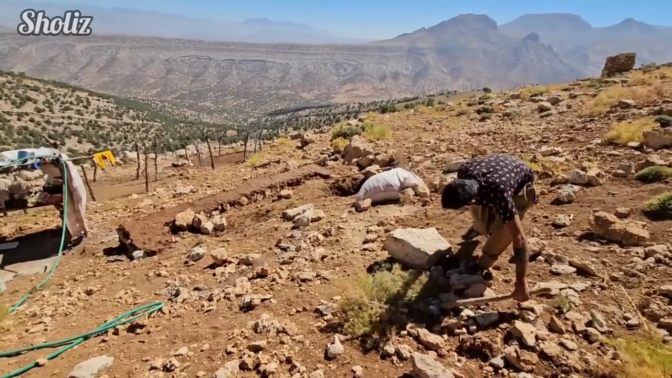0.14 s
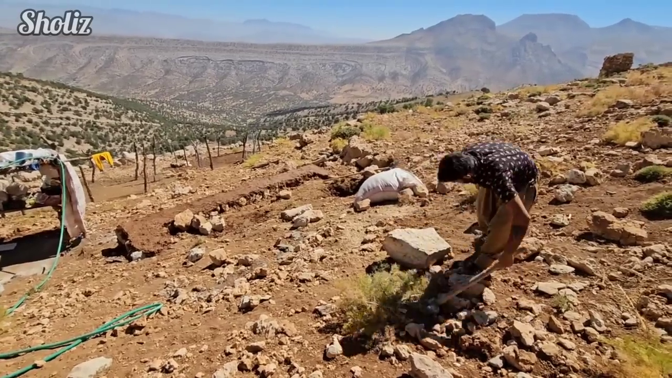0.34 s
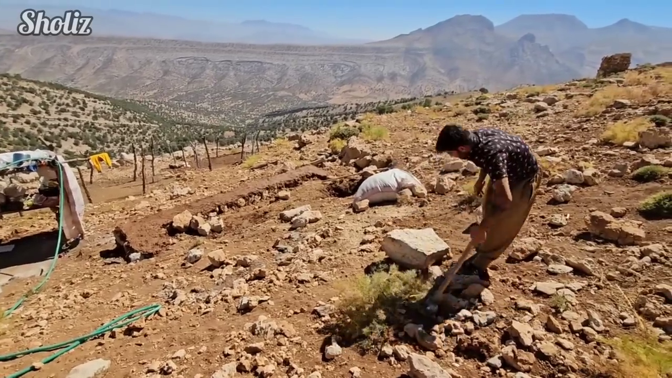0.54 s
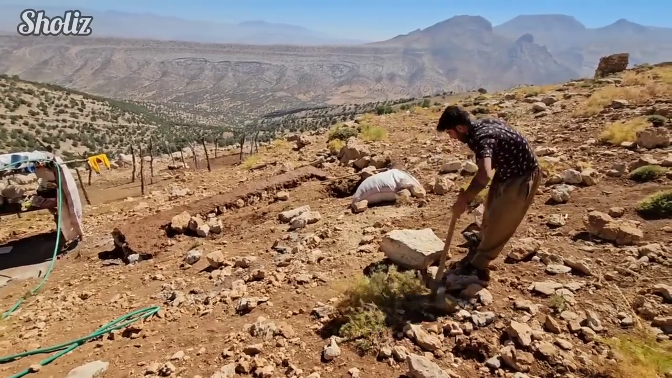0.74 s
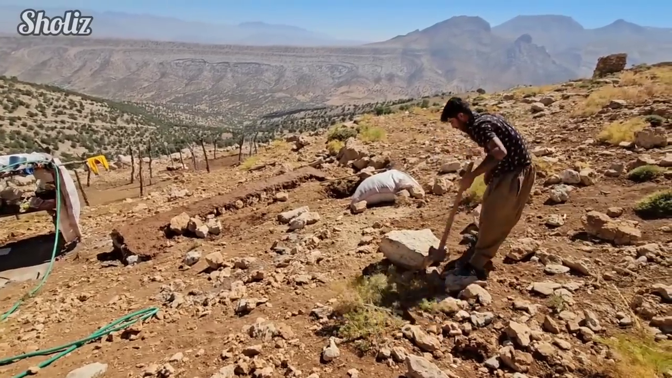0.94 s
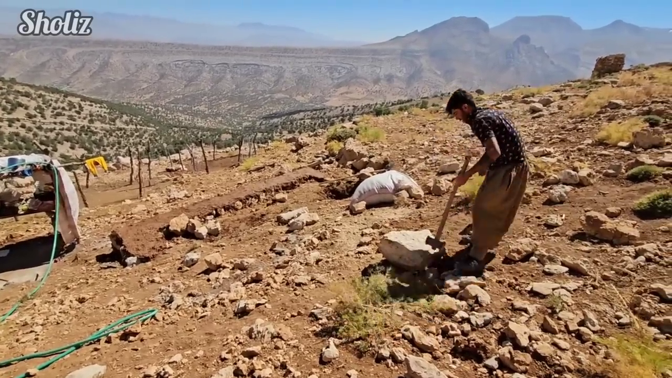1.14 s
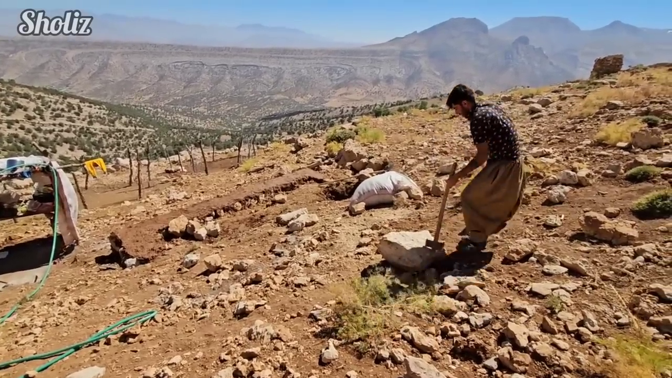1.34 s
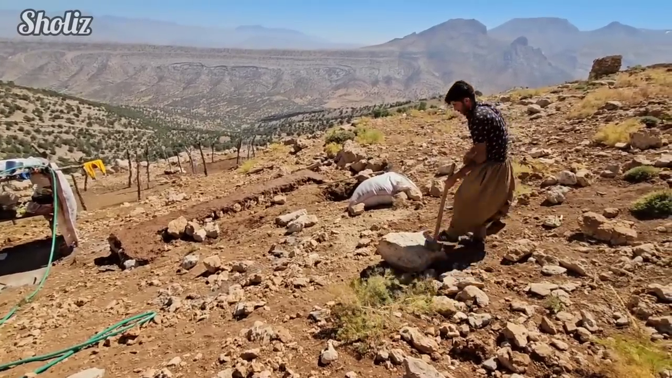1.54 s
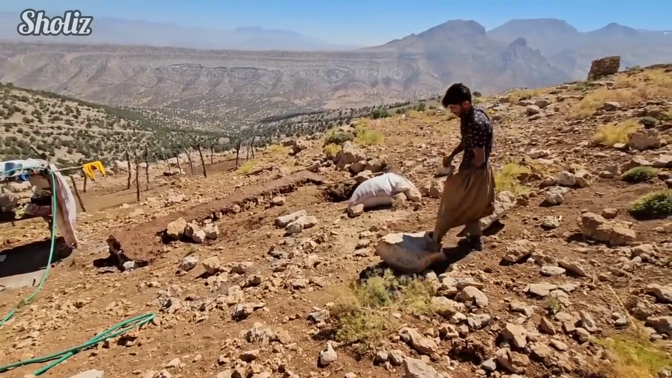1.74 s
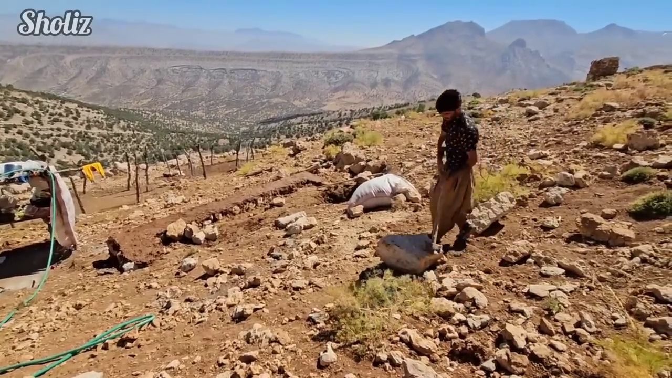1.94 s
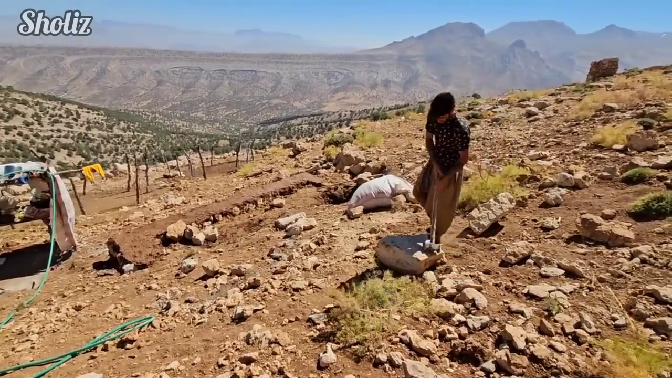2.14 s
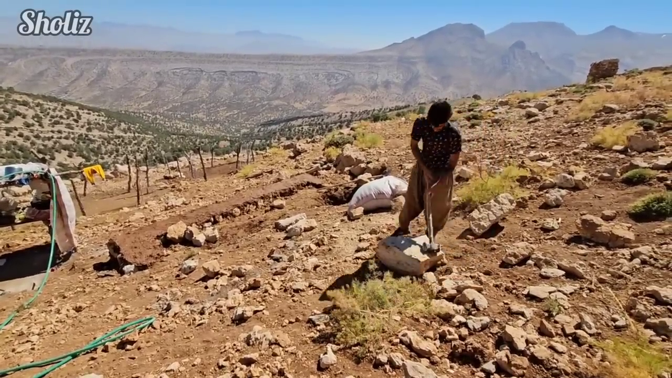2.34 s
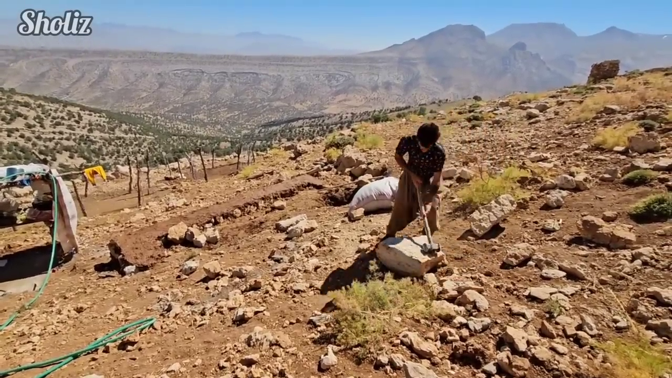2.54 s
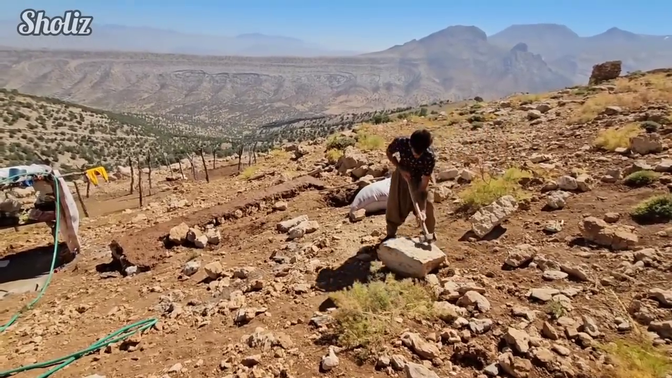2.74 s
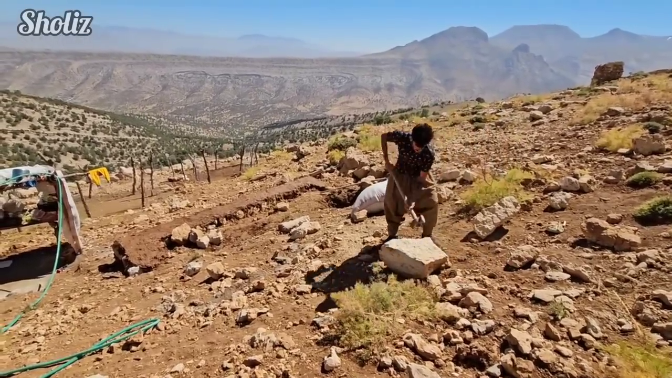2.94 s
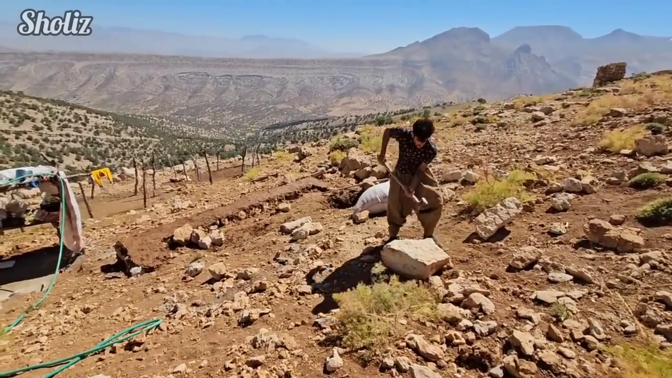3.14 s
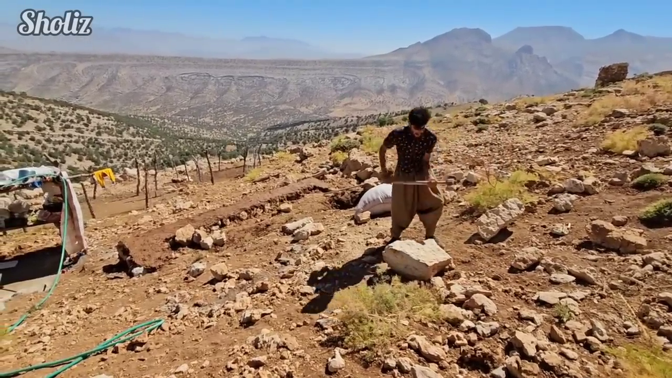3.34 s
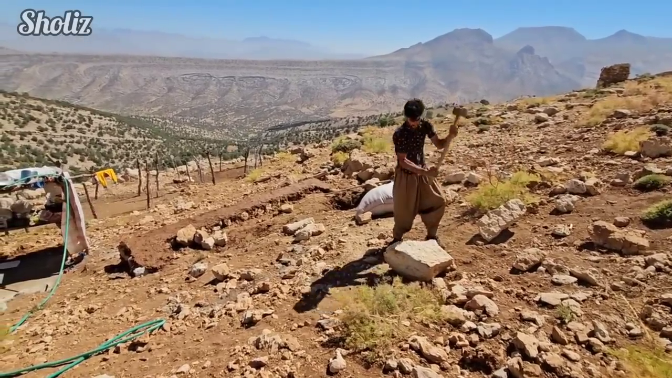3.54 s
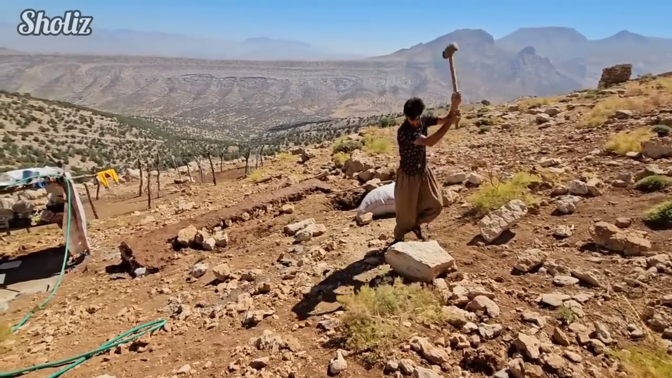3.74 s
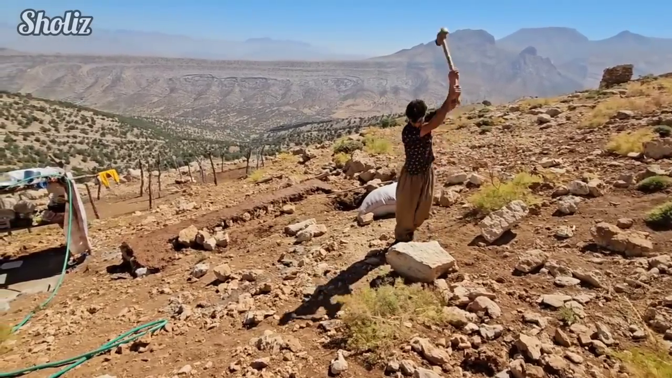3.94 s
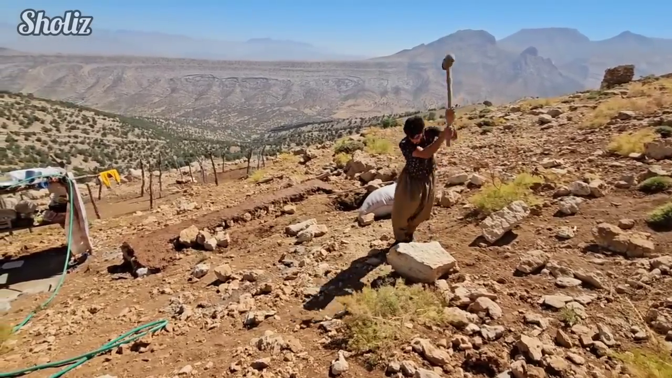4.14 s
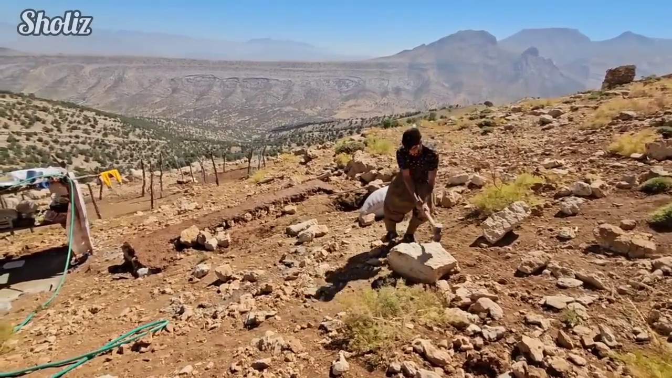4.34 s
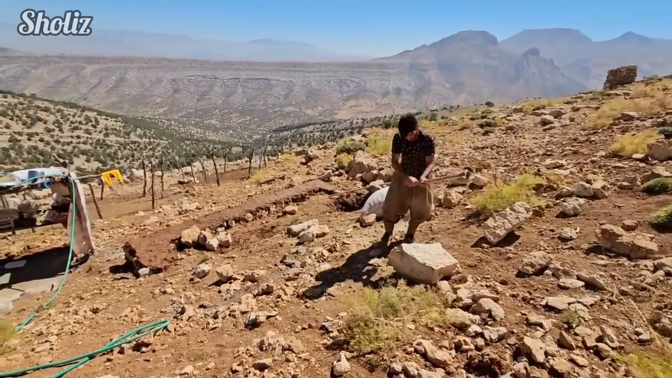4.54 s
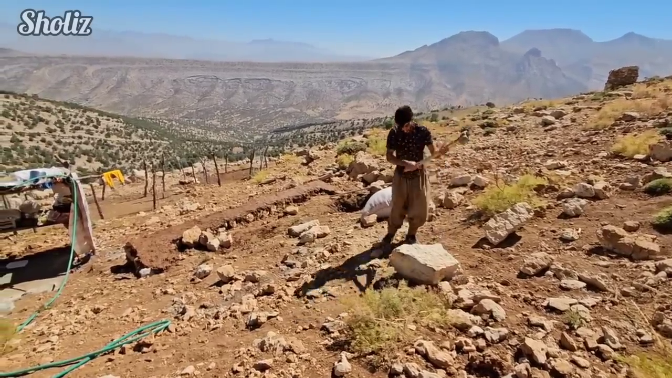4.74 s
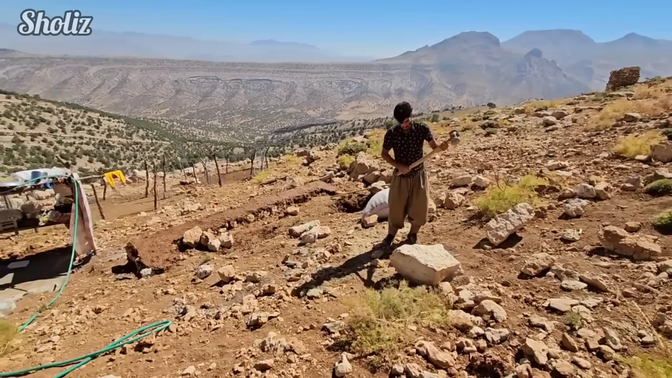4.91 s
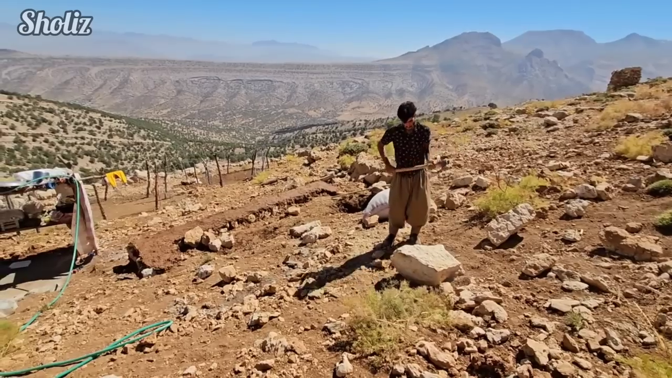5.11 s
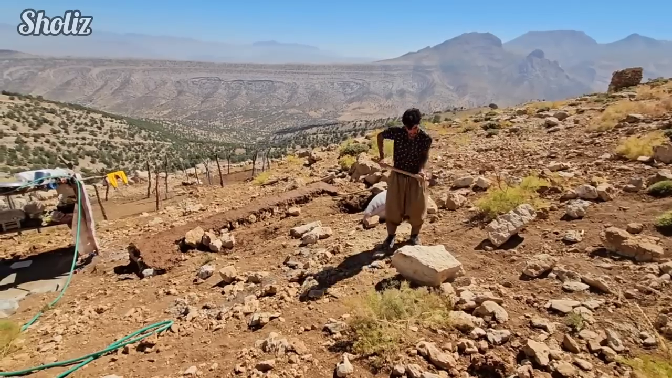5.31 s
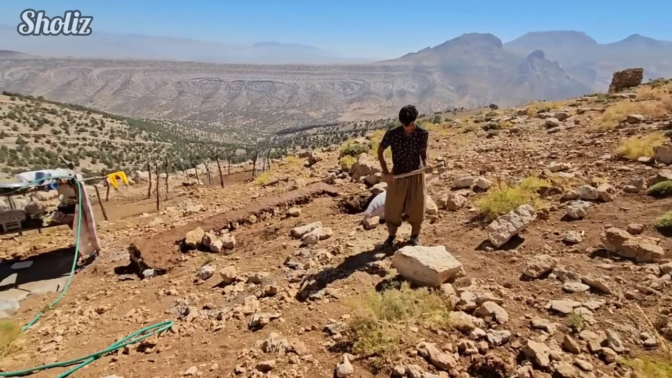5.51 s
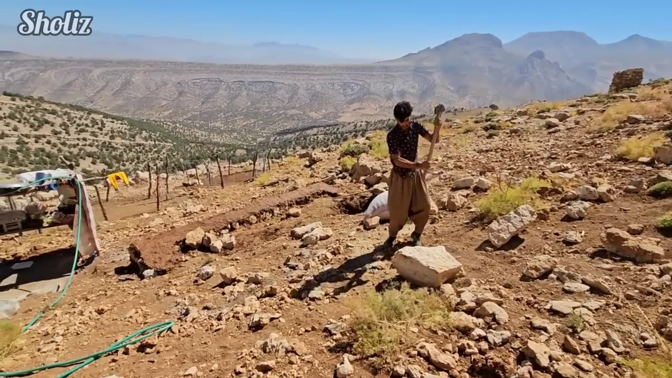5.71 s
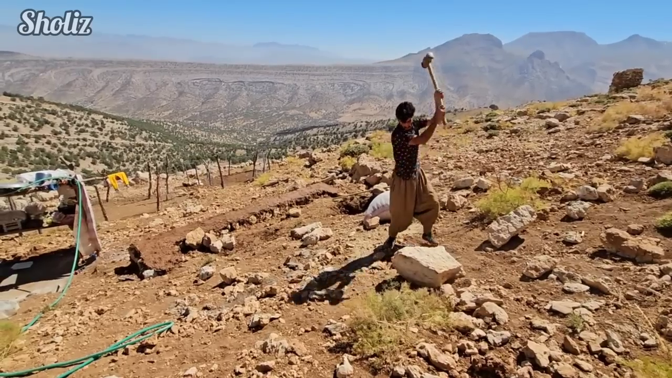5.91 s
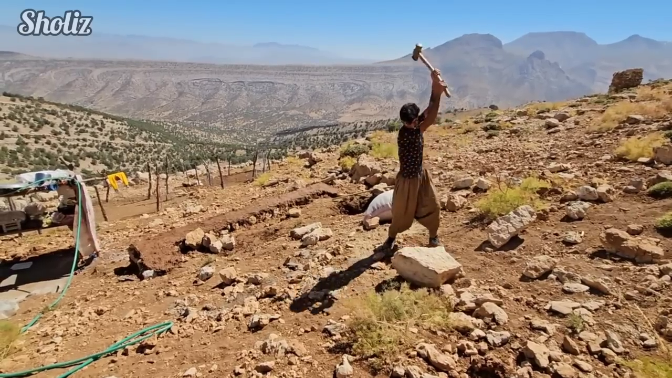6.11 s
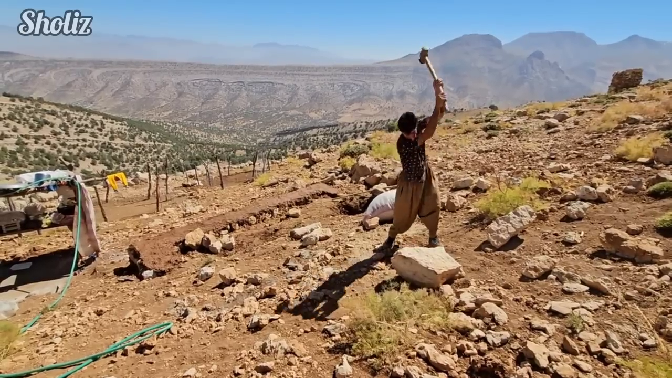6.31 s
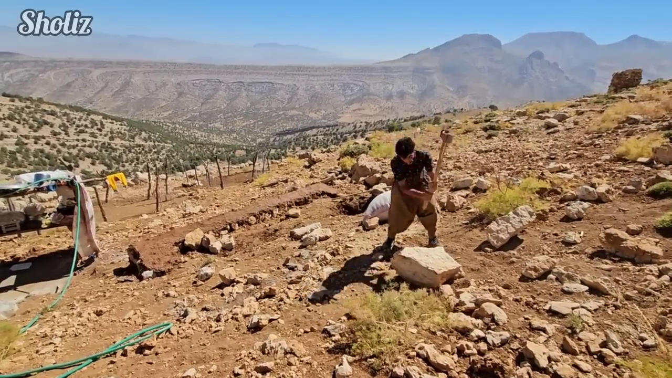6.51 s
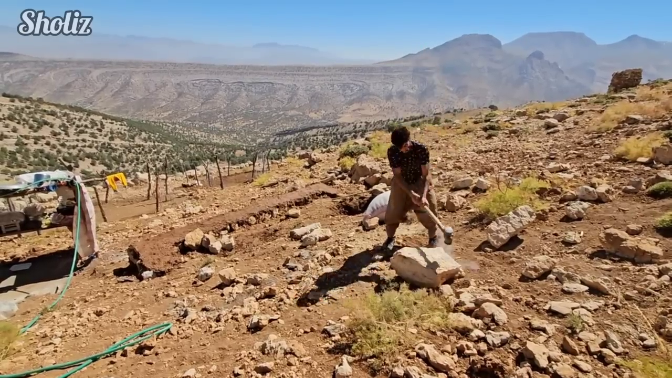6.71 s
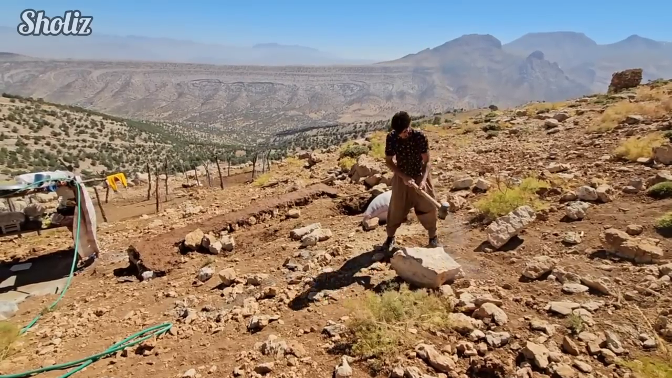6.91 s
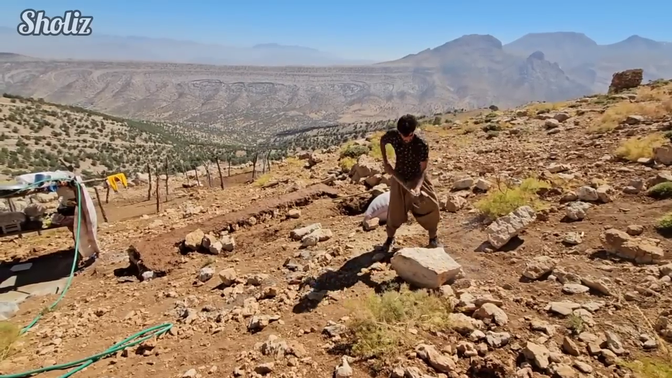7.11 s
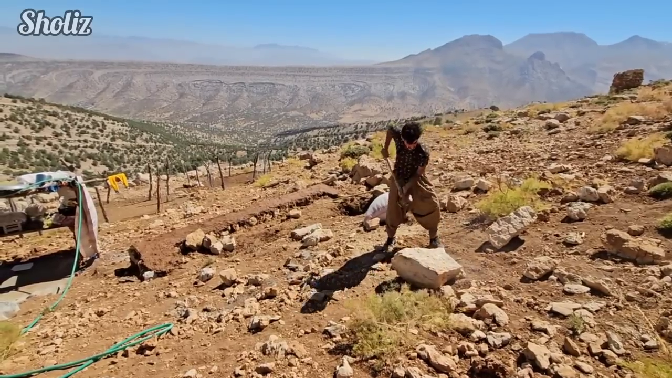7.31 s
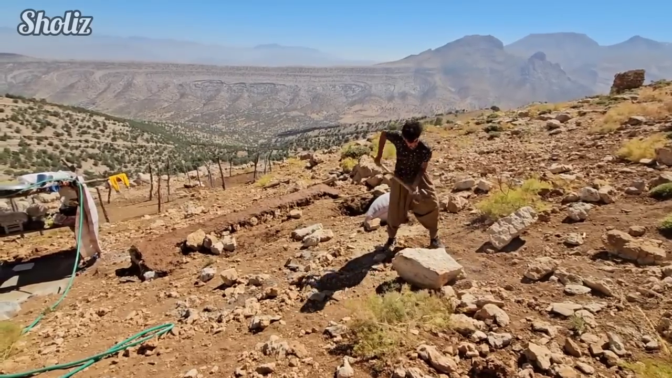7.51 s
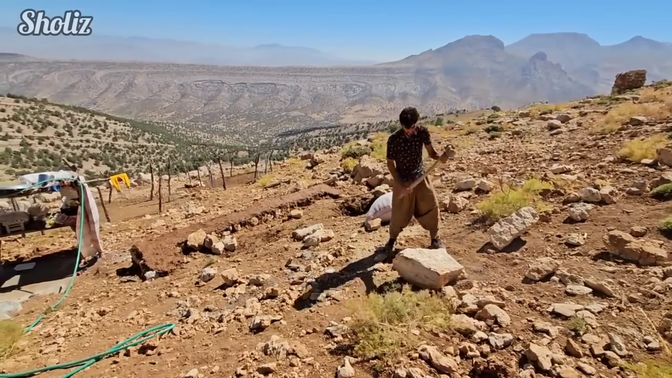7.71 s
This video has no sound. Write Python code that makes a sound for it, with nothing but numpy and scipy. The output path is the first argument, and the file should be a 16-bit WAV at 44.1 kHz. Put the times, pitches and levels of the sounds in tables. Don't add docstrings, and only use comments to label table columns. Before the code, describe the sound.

Low gusts thump on an unshielded handheld stereo microphone. A moderate clack of steel on stone comes first, followed by gritty steps round the rock and pebbles clicking. Then come two very loud, abrupt hammer cracks about two seconds apart, each with a brief high steel ring, ticking splinters and a faint open-air echo. Dry grass rustles lightly and a faint distant engine putters in bursts beneath the hiss of air.

```python
import sys
import numpy as np
from scipy import signal
from scipy.fft import rfft, irfft, next_fast_len
from scipy.io import wavfile

SR = 44100
rng = np.random.default_rng(int(sys.argv[2]) if len(sys.argv) > 2 else 0)


def amplitude_ratio(level_db):
    exponent = np.asarray(level_db, float) / 20
    return 10 ** exponent


def generate_wav(signal):
    frames = np.transpose(np.atleast_2d(signal))
    scaled = np.clip(frames, -1, 1) * 32767
    pcm = np.round(scaled).astype(np.int16)
    wavfile.write(sys.argv[1], SR, pcm)


N = 346626

BLOW_TIMES = [
    1.2012,
    4.3541,
    6.5984,
    6.6262,
]
# peak in dB, crack in dB, crack length in seconds, scatter in dB,
# scatter decay in seconds, crushing time in seconds.
BLOWS = [
    (-17.5, -11.5, 0.0051, -40.5, 0.0085, 0.00042),
    (0.5, -10, 0.0014, -27.5, 0.024, 0.0006),
    (1, -8.5, 0.0011, -23, 0.011, 0.0003),
    (-15.5, -20, 0.00087, -21.5, 0.017, .0004),
]
SLAM_DB = [-4.5, -3, -2.5, 1]
# pitch in Hz, t60 in seconds.
ROCK_MODES = [(300,0.027),(540,0.022),(705,0.018),(1020,0.0069),(1260,0.009),(1420,.013),(1800,0.012),(2050,0.022),(2720,.012),(3300,.01),(4200,0.014),(5200,0.036)]
ROCK_DRIVE_DB = [
    (-6.5, -1.5, -2.5, -4, -3.5, -6.5, 2.5, -2, -9, -3.5, -15, -18),
    (-18, -12.5, -5.5, -7, 0.0, -0.5, -1.5, -12, -15.5, -18.5, -28.5, -15.5),
    (-23.5, -14.5, -6.5, -5.5, -1, -2, -11, -10, -12.5, -22.5, -12.5, -14),
    (-11.5, -5, -0.5, 1.5, -2.5, -6, -6.5, -10, -19, -16, -21, -20.5),
]
HEAD_HZ = [5190, 7141, 7198, 7225, 8317, 8390, 8565, 11300, 11900, 14390]
HEAD_T60_S = [0.12, 0.3, 0.53, 0.2, .2, 0.23, 0.06, 0.35, .07, .2]
HEAD_DRIVE_DB = [
    (-56, -51, -57, -52.5, -49, -67.5, -62, -63, -48, -50),
    (-38, -36.5, -33.5, -24.5, -38.5, -40.5, -38, -61.5, -46, -47),
    (-39, -50.5, -42, -48, -42, -35.5, -34, -67, -46, -60.5),
    (-59, -48.5, -38, -45.5, -54.5, -63.5, -66.5, -66.5, -68, -68),
]
# frequency in Hz, density in dB per Hz.
CRACK_COLOUR = [(2000, -7.5), (3000, -0.5), (4500, 2.5), (6200, 2), (8400, -8), (9600, -14.5),
                (11300, -3.5), (13000, -8.5), (16000, -10), (20000, -40.5)]
# frequency in Hz, density in dB per Hz.
SCATTER_COLOUR = [(150, -39), (250, 0), (348, -22), (528, 0.5), (890, -7.5), (2000, -4), (5160, -12),
                  (6590, -19), (8400, -13.5), (9900, -22.5), (11400, -17.5), (16000, -23.5)]
# frequency in Hz, gain in dB, phase in radians.
SHADOW = [(300, 4, 0.43), (750, 3.5, -1.37), (1100, 2.5, -1.22), (1800, -2, -1.4), (3000, 0.5, -0.7),
          (4200, 2.5, 2.16), (8400, 0.5, 1.41), (10960, 0, 0.5), (13300, -2.5, 3)]
# time in seconds, level in dB.
GRAZES = [
    (2.625, -73),
    (2.694, -67),
]

# time in seconds, peak in dB, pitch in Hz, bright edge in dB.
STONES = [(0.376, -59, 765, -53), (0.958, -53.5, 1590, -22), (1.013, -45, 686, -17), (1.3, -44, 730, -28),
          (1.342, -45.5, 1780, -20), (1.545, -44.5, 1890, -9), (2.74, -53, 4250, -20),
          (1.375, -48, 1500, -20), (1.651, -44.5, 720, -38), (1.667, -43.5, 1710, -24),
          (1.567, -51.5, 2220, -19), (1.895, -55, 2000, -15), (2.168, -55.5, 2300, 9),
          (2.232, -53.5, 1280, 3.5), (2.540, -45.5, 2060, -12), (0.824, -65, 1430, -6),
          (0.876, -60, 1510, -15), (1.011, -47, 1860, -23), (1.455, -71, 1680, -27),
          (2.003, -53, 1490, -26), (2.394, -52, 2050, -15), (2.396, -69, 4050, -22),
          (2.563, -56, 1760, -22), (2.624, -49.5, 2340, -16), (2.687, -47, 1700, -13),
          (2.825, -77, 3100, -30), (2.996, -44.5, 955, -26), (3.006, -61, 2030, -14),
          (2.914, -51, 870, -16), (3.253, -63, 1390, -22), (3.302, -42.5, 846, -14.5),
          (3.42, -58, 794, -37), (3.527, -48, 820, -18), (4.965, -75, 598, 3.5), (5.24, -80.5, 485, 11.5),
          (5.35, -59.5, 730, -29), (5.643, -50, 686, -8.5), (5.858, -53.5, 810, -12.5),
          (5.921, -71, 790, -33), (6.635, -42.5, 810, 8.5), (6.925, -60, 1330, 3), (7.158, -72, 532, 7)]
# time in seconds, peak in dB, pitch in Hz, bright edge in dB.
SLAB = [
    (0.398, -48, 366.6, -63),
    (5.441, -70.5, 341.5, -32),
    (5.857, -56.5, 359, -44.5),
    (5.922, -51, 380, -52),
]
# time in seconds, peak in dB, pitch in Hz, bright edge in dB.
KNOCKS = [
    (2.694, -34, 673, -44),
    (4.508, -44.5, 1290, -63),
    (4.559, -55, 700, -42),
    (6.491, -46, 640, -39),
]
# time in seconds, peak in dB, pitch in Hz, bright edge in dB.
SPLINTERS = [(0.537, -69, 3000, 14.5), (0.771, -74, 3000, 9), (0.803, -66, 3000, 9), (0.868, -80, 3000, 16),
             (4.694, -64, 899, -18), (4.725, -74, 1560, -11), (6.641, -63.5, 3000, 6),
             (6.656, -53, 2000, -4), (6.692, -74.5, 3000, 14), (6.697, -68, 3000, 14),
             (6.742, -73, 3000, 18), (6.802, -68.5, 3000, 15.5), (6.958, -77, 3000, 14),
             (6.756, -79.5, 3000, 15.5), (6.861, -76, 3000, 14), (6.875, -82, 3000, 14),
             (6.911, -84, 3000, 12)]
# time in seconds, peak in dB, pitch in Hz, bright edge in dB.
FLAKES = [(4.53, -64, 2060, -50), (4.585, -84.5, 4250, -50), (4.64, -76, 11400, -50),
          (4.665, -75, 1324, -49.5), (5.31, -86, 1670, -50.5), (5.395, -89, 2700, -45),
          (5.452, -71, 3160, -46.5), (6.93, -68, 1392, -51.5)]

# start in seconds,
# length in seconds, crunch in dB, larger stones in dB above it, grit in dB above it.
SCUFFS = [(0.875, 0.021, -46, -11, -12.5), (0.95, 0.069, -48.5, -2, -11.5), (1.219, 0.15, -54, -0.5, -6),
          (1.331, 0.049, -41, -8.5, -14.5), (1.542, 0.03, -53, -10, -1.5), (1.607, 0.023, -54, -25, -2.5),
          (1.663, 0.071, -44, -10.5, -12.5), (1.75, 0.055, -60.5, 1.5, -13.5), (1.89, 0.0098, -54, -6, -4),
          (1.935, 0.079, -51.5, -5, -10), (1.998, 0.043, -41.5, -13.5, -10.5),
          (2.06, 0.079, -62.5, -21, -1.5), (2.229, 0.042, -56.5, -4.5, 2), (2.282, 0.12, -48, -10.5, -7.5),
          (2.451, 0.11, -61, 5.5, -8), (2.537, 0.016, -49, -7, 1), (2.608, 0.15, -49, -18, -6.5),
          (2.813, 0.031, -59.5, -9, -10), (2.905, 0.071, -52, -4.5, -10), (2.99, 0.068, -43.5, -3.5, -9.5),
          (3.094, 0.097, -52, -1.5, -13.5), (3.252, 0.084, -46.5, -7.5, -15), (3.402, 0.055, -61, 8, -12.5),
          (3.518, 0.0079, -62, 21, 2),
          (0, 0.0047, -52, 8.5, 1.5), (.14, 0.12, -78, -19, -14), (0.376, 0.053, -58, 10, -4),
           (.47, 0.12, -74, -3, -1), (0.594, 0.0043, -62.5, 5.5, 7), (0.811, 0.079, -56, -14, -6.5),
           (3.721, 0.26, -66.5, -1.5, -23), (4.2, 0.19, -75.5, 10.5, -10), (4.45, 0.024, -65, -9, -11),
           (4.69, 0.007, -82, 16.5, -4), (5.342, 0.11, -84.5, 23, -12), (5.638, 0.035, -62, 13.5, -5.5),
           (5.847, 0.064, -62.5, 7, -9), (5.918, 0.046, -52.5, 3.5, -13.5), (6.0, .25, -80.5, -3, 13.5),
           (6.467, 0.089, -69.5, -9, -3.5), (6.7, 0.097, -76.5, 9, 7), (6.919, 0.047, -63, 1, -8),
           (7.0, 0.1, -74, -17, -10), (7.2, 0.31, -76.5, 3.5, -2)]
# frequency in Hz, density in dB per Hz.
GRAVEL_COLOUR = [(240, -44), (400, -20), (814, -6), (1220, -5.5), (1730, -7), (3310, -21), (4050, -17),
                 (5110, -24.5), (7060, -20.5), (7870, -28), (16000, -46)]

# start in seconds, length in seconds, level in dB.
RUSTLES = [(0, 0.023, -65.5), (0.128, 0.61, -73), (2.122, 0.067, -68), (3.374, 0.23, -77),
           (3.643, 0.086, -70.5), (5.875, 0.95, -72.5), (6.698, 0.15, -74.5), (6.864, 0.24, -64.5),
           (7.247, 0.32, -69.5), (7.638, 0.17, -68)]
# frequency in Hz, density in dB per Hz.
GRASS_COLOUR = [(900, -19), (1850, -4.5), (3100, -11), (4600, -8), (5900, -11.5), (7300, -4.5),
                (9700, -13.5), (11200, -7), (16000, -15.5)]

# time in seconds, level in dB, exhaust pitch as a factor.
PUTTER = [(0, -79, 1), (3.7, -84, 1), (4.2, -85.5, .85), (4.26, -71, 1.05), (4.31, -62, 1.1),
          (4.36, -69, 0.86), (4.5, -84, 1), (5.03, -98, .8), (5.1, -74.5, .9), (5.17, -69, 1.1),
          (5.23, -71, 1.02), (5.28, -88, .9), (6.7, -83.5, .9), (6.85, -69, 1), (7.0, -85, .9),
          (7.3, -79, .9), (7.43, -71.5, 1.03), (7.5, -79, .9), (7.54, -94.5, 0.83), (7.72, -100, .85),
          (7.78, -72, 1), (7.86, -73, 1)]
# pitch in Hz, t60 in seconds, level in dB.
EXHAUST_MODES = [(730, .04, 0), (1050, .025, -13), (1250, .035, -7), (1850, .025, -16)]

# start in seconds, length in seconds, rumble in dB, left over right in dB.
GUSTS = [(0, 0.34, -36.5, -6), (0.48, 0.14, -34.5, -7.5), (0.611, 0.2, -31, -2.5),
         (1.045, 0.18, -36.5, -3.5), (1.257, 0.075, -40, -8), (1.418, 0.11, -37, -3.5),
         (1.578, 0.31, -43.5, -8), (1.839, 0.05, -37.5, -10), (2.087, 0.039, -25, -9.5),
         (2.17, 0.4, -38, -4), (2.592, 0.41, -36, -6.5), (3.155, 0.15, -38.5, -5.5),
         (3.363, 0.15, -32.5, -2), (3.574, 0.37, -33.5, -4.5), (3.751, 0.35, -31, -1),
         (4.148, 0.14, -30, 5), (4.318, 0.12, -38, -4), (4.564, 0.039, -28, -8), (4.84, 0.19, -36, 7.5),
         (5.052, 0.039, -25.5, 6), (5.154, 0.496, -33, 3.5), (5.726, 0.069, -28.5, 5),
         (6.019, 0.47, -36.5, -4.5), (6.498, 0.13, -31.5, -4.5), (6.775, .07, -53, -11),
         (6.874, 0.088, -38, -7.5), (7.195, 0.18, -40.5, 4), (7.516, 0.079, -36.5, -5),
         (7.592, 0.057, -25.5, 1), (7.686, 0.063, -36, 0.5)]
# time in seconds, flutter in dB.
FACING = [(0, -43.5), (1, -45), (2, -45.5), (3.3, -49), (4, -52.5), (4.8, -52.5), (5.5, -50.5), (6.4, -44),
          (7, -50.5), (7.86, -50)]
# frequency in Hz, density in dB per Hz.
WIND_COLOUR = [(8.8, -43), (15, -6.5), (43, 2.5), (70, 3), (125, -10), (255, -24), (334, -30), (374, -40),
               (450, -45.5), (580, -79), (990, -120)]
# frequency in Hz, density in dB per Hz.
AIR_COLOUR = [(180, -32.5), (300, 0.5), (418, -15), (656, -9), (1010, -18), (1930, -24.5), (7300, -34.5),
              (8500, -42), (9900, -39), (11300, -29), (16000, -35.5)]


def hammer():
    out = np.zeros((2, N + SR))
    age = np.arange(SR) / SR
    clumps = drift(60)
    shards = grains(1500, spread_db=2.5)
    for s, blow, drive_db, steel_db, slam_db in zip(BLOW_TIMES, BLOWS, ROCK_DRIVE_DB, HEAD_DRIVE_DB, SLAM_DB):
        peak_db, crack_db, crack_s, scatter_db, fade_s, crush_s = blow
        start, offset = round(s * SR), round(s * SR) % SR
        noise = rng.standard_normal((4, SR))
        knock = boulder(age, noise[:2], crush_s, drive_db, slam_db)
        steel = head(age, steel_db)
        snap = amplitude_ratio(crack_db + 3) * crack(age, noise[1:3], crack_s)
        struck = ports(knock[0] + steel, knock[1], size=0, alike=.95) + snap
        clump_db = 3 * clumps[offset:][:SR]
        debris = noise[2:] + .6 * shards[offset:][:SR]
        debris = chips(age, debris, fade_s) * amplitude_ratio(scatter_db + clump_db)
        sound = shadowed(struck) * (age < .8) + debris
        out[:, start:][:, :SR] += amplitude_ratio(peak_db) * sound
        out[:, start - 900:start] += amplitude_ratio(peak_db) * lead_in(noise[:2])
        thud = amplitude_ratio(peak_db - 21) * np.exp(-((age - .0028) / .0005) ** 2)
        out[:, start - 240:][:, :SR] += band(thud, 90, 800)
    return out[:, :N]


def boulder(age, noise, crush_s, drive_db, slam_db):
    split_hz, split_s, rough = 1200, .0008, 1.2
    crush = age / crush_s ** 2 / SR * np.exp(-age / crush_s)
    phases = rng.uniform(0, 2 * np.pi, (len(ROCK_MODES), 2, 1))
    knock = 0
    for (hz, t60), db, phase in zip(ROCK_MODES, drive_db, phases):
        late = round(split_s * SR) * (hz > split_hz)
        texture = np.sin(2 * np.pi * hz * age + phase) + rough * noise
        knock = knock + amplitude_ratio(db) * ring(np.roll(crush, late) * texture, hz, t60)
    knock = band(knock, 200, 9000)
    slam = band(np.exp(-((age - .0006) / .00017) ** 2), 450, 3500)
    return peak_one(knock) - amplitude_ratio(slam_db) * peak_one(slam)


def head(age, steel_db):
    sag_per_s, swell_s, turn_db, rattle_db = .0145, .0066, 3, 7
    bent = age - sag_per_s * age ** 2 / 2
    turn = np.roll(drift(14), -rng.integers(N))[:SR]
    rattle = drift(120)
    steel = 0
    for k, (hz, db, t60) in enumerate(zip(HEAD_HZ, steel_db, HEAD_T60_S)):
        is_long = 7000 < hz < 7300
        sway_db = turn_db * turn if is_long else rattle_db * rattle[k * 9000:][:SR]
        steel = steel + amplitude_ratio(db - 60 * age / t60 + sway_db) * np.sin(2 * np.pi * hz * bent)
    return (1 - np.exp(-age / swell_s)) * steel


def crack(age, noise, crack_s):
    burst = age / crack_s * np.exp(1 - (age / crack_s) ** 1.5)
    split = band(coloured(noise, CRACK_COLOUR) * burst, 1800, 17000)
    return ports(*split, size=0, alike=.85)


def chips(age, debris, fade_s):
    bright_fade = .22
    debris = rms_one(coloured(debris, SCATTER_COLOUR))
    bright = band(debris, 6000, 20000)
    debris = debris - bright * (1 - np.exp(-age / (fade_s / bright_fade)))
    near = np.exp(-age / fade_s)
    far_slope = amplitude_ratio(-26.5) * np.exp(-(age / (6.2 * fade_s)) ** 2)
    return debris * (near + far_slope) * (1 - np.exp(-age / .005))


def lead_in(noise):
    swell = rms_one(coloured(noise[:, :9000], SCATTER_COLOUR))[:, :900]
    return swell * amplitude_ratio(-32.5 + np.linspace(-16, 0, 900)) * np.linspace(0, 1, 900)


def shadowed(pair):
    hz, gain_db, phase = np.transpose(SHADOW)
    grid = np.log(np.arange(SR // 2 + 1) + 1)
    gain_db = np.interp(grid, np.log(hz), gain_db)
    phase = np.interp(grid, np.log(hz), phase)
    return irfft(rfft(pair, SR) * [amplitude_ratio(gain_db / 2) * np.exp(1j * phase), amplitude_ratio(-gain_db / 2)], SR)


def grazes():
    s, level_db = np.transpose(GRAZES)
    clicks = np.zeros(N)
    clicks[(s * SR).astype(int)] = amplitude_ratio(level_db)
    steel = sum(ring(clicks, hz, t60) for hz, t60 in zip(HEAD_HZ[2:4], HEAD_T60_S[2:4]))
    return ports(steel, steel, size=5, alike=.7)


def stones():
    stone_cycles = 24
    kinds = [(STONES, stone_cycles, .3), (SLAB, 48, .35), (KNOCKS + SPLINTERS, 4, .03), (FLAKES, 320, .5)]
    out = np.zeros(N + SR)
    age = np.arange(SR // 8) / SR
    for rows, cycles, slide in kinds:
        dullness = amplitude_ratio(-5) * min(1, stone_cycles / cycles)
        for s, peak_db, hz, edge_db in rows:
            sound = click(age, hz, cycles, slide, dullness, edge_db)
            out[round(s * SR):][:len(age)] += amplitude_ratio(peak_db + 11) * sound
    return ports(out[:N], np.roll(out[:N], 31), size=-20, alike=.91)


def click(age, hz, cycles, slide, dullness, edge_db):
    contact = np.exp(-age / .0018) + slide * np.exp(-age / .014)
    burst = rng.standard_normal(len(age)) * contact
    tick = band(band(burst, .6 * hz, min(3.5 * hz, 20000)), .5 * hz, min(5 * hz, 21000))
    body = peak_one(ring(burst, hz, cycles / hz)) + dullness * tick
    edge = band(burst, 4300, 21000)
    return peak_one(body) + amplitude_ratio(edge_db) * peak_one(edge)


def gravel():
    bite_s, settle_s, grit_settle_s = .00086, .025, .015
    scuffs = SCUFFS
    heavy, light = spells(scuffs, bite_s, settle_s), spells(scuffs, bite_s, grit_settle_s)
    crunch_db, stone_db, grit_db = np.transpose(scuffs)[2:]
    slip = drift(31)
    fine = coloured(grains(2000 * amplitude_ratio(5 * slip), spread_db=-.5), GRAVEL_COLOUR)
    crunch = pebbles(1050, 3100, 63, count=14) + amplitude_ratio(-10) * rms_one(band(fine, 1400, 2000))
    stone = pebbles(540, 850, 27, count=7) + amplitude_ratio(-9) * rms_one(band(fine, 340, 1600))
    grit = pebbles(2850, 7900, 110, count=14) + amplitude_ratio(-5) * rms_one(band(fine, 2700, 8200))
    dust = band(fine, 8200, 16500)
    layers = np.array([rms_one(layer) for layer in (crunch, stone, grit, dust)])
    levels = np.array([
        summed(heavy, crunch_db),
        summed(heavy, crunch_db + stone_db),
        summed(light, crunch_db + grit_db),
        summed(light, crunch_db + grit_db - 10)])
    levels *= amplitude_ratio(2.5 * np.roll(slip, SR))
    direct = (levels * layers).sum(axis=0)
    scattered = (levels * np.roll(layers, SR, axis=1)).sum(axis=0)
    return ports(direct, scattered, size=-20, alike=.75)


def pebbles(low_hz, high_hz, cycles, count):
    contacts = grains(1100 * amplitude_ratio(3.4 * drift(45)), spread_db=-1)
    dealt = rng.integers(0, count, N)
    pitches = np.geomspace(low_hz, high_hz, count) * rng.uniform(.87, 1.04, count)
    rings = 0
    for k, hz in enumerate(pitches):
        hits = contacts * (dealt == k) * amplitude_ratio(6 * drift(7.3))
        rings = rings + ring(hits, hz, cycles / hz)
    return rms_one(coloured(rings, GRAVEL_COLOUR))


def grass():
    near, other = coloured(rng.standard_normal((2, N)), GRASS_COLOUR) * amplitude_ratio(1.7 * drift(25))
    stirs = summed(spells(RUSTLES, rise_s=.014, fall_s=.041), np.transpose(RUSTLES)[2])
    return stirs * rms_one(ports(near, other, size=-19, alike=.6))


def wind():
    calm_db, flutter_follows = -47, .85
    shapes = spells(GUSTS, rise_s=.0076, fall_s=.018)
    level_db, pan_db = np.transpose(GUSTS)[2:]
    gusts = np.array([np.hypot(summed(shapes, level_db + side * pan_db), amplitude_ratio(calm_db)) for side in (.5, -.5)])
    shared, own = coloured(rng.standard_normal((2, N)), WIND_COLOUR)
    pair = ports(shared, own, size=0, alike=.75) * amplitude_ratio(2.8 * drift(27))
    rumble = rms_one(signal.sosfilt(signal.butter(4, 100, fs=SR, output="sos"), pair))
    flutter_db = in_time(FACING)[0] + 3.6 * drift(35)
    flutter = rms_one(band(pair, 105, 340)) * amplitude_ratio(flutter_db) * amplitude_ratio([[-1.2], [1.2]])
    return gusts * rumble + (gusts / amplitude_ratio(-35.5)) ** flutter_follows * flutter


def engine():
    firing_hz = 59
    level_db, bend = in_time(PUTTER)
    turns = np.cumsum(firing_hz * (1 + .018 * drift(18))) / SR
    fires = np.diff(np.floor(turns), prepend=0) > 0
    fired = np.maximum.accumulate(np.arange(N) * fires)
    since = (np.arange(N) - fired) / SR
    strength = amplitude_ratio(2.5 * drift(40))[fired]
    pops = sum(amplitude_ratio(db - 60 * since / t60) * np.sin(2 * np.pi * hz * bend[fired] * since)
               for hz, t60, db in EXHAUST_MODES)
    tone = rms_one(band(strength * pops, 390, 2200))
    return amplitude_ratio(level_db) * ports(tone, np.roll(tone, 200), size=0, alike=.92)


def air():
    return amplitude_ratio(-71) * rms_one(coloured(rng.standard_normal((2, N)), AIR_COLOUR))


def rms_one(x):
    return x / np.sqrt(np.mean(x ** 2) + 1e-20)


def peak_one(x):
    return x / np.max(np.abs(x))


def in_time(rows):
    s, *columns = np.transpose(rows)
    return [np.interp(np.arange(N) / SR, s, column) for column in columns]


def drift(rate):
    r = np.exp(-80 * np.pi * rate / SR)
    slow = signal.lfilter([1], [1, -2 * r, r * r], rng.standard_normal(N // 40 + 2002))[2000:]
    return np.interp(np.arange(N) / 40, np.arange(len(slow)), rms_one(slow))


def grains(per_s, spread_db):
    sizes = amplitude_ratio(spread_db * np.minimum(rng.exponential(1, N), 4)) * rng.choice([-1, 1], N)
    return rms_one(sizes * (rng.random(N) < per_s / SR))


def coloured(x, spectrum):
    hz, level_db = np.transpose(spectrum)
    length = x.shape[-1]
    size = next_fast_len(length)
    grid = np.log(np.arange(size // 2 + 1) * SR / size + 1)
    gain = amplitude_ratio(np.interp(grid, np.log(hz), level_db))
    return irfft(rfft(x, size) * gain, size)[..., :length]


def band(x, low_hz, high_hz):
    return signal.sosfilt(signal.butter(2, [low_hz, high_hz], "band", fs=SR, output="sos"), x)


def ring(push, hz, t60):
    r = amplitude_ratio(-60 / (t60 * SR))
    w = 2 * np.pi * hz / SR
    return signal.lfilter([0, np.sin(w)], [1, -2 * r * np.cos(w), r * r], push + 1e-18)


def spells(rows, rise_s, fall_s):
    start, length = np.transpose(rows)[:2, :, None]
    age = np.arange(0, N + 32, 32) / SR - start
    rise = 1 - np.exp(-np.clip(age, 0, None) / rise_s)
    return rise * np.exp(-np.clip(age - length, 0, None) / fall_s)


def summed(shapes, level_db):
    gain = np.sqrt(amplitude_ratio(level_db) ** 2 @ shapes ** 2)
    return np.interp(np.arange(N) / 32, np.arange(shapes.shape[1]), gain)


def ports(x, other, size, alike):
    alike = np.clip(alike, 0, 1)
    return np.array([np.roll(x, size), alike * x + np.sqrt(1 - alike ** 2) * other])


def scene():
    return hammer() + grazes() + stones() + gravel() + grass() + wind() + engine() + air()


def roll_off(x):
    return signal.sosfilt(signal.butter(12, 16620, fs=SR, output="sos"), x)


def record(dry):
    top = .9
    held = dry / (1 + np.abs(dry / top) ** 4) ** .25
    finished = signal.sosfilt(signal.cheby2(12, 60, 16600, fs=SR, output="sos"), held)
    return roll_off(finished)


dry = scene()
out = record(dry)
generate_wav(out)
```